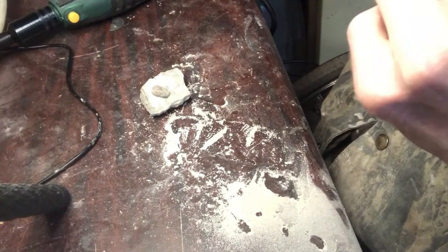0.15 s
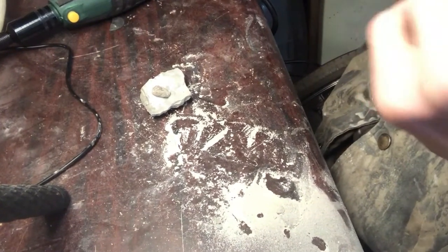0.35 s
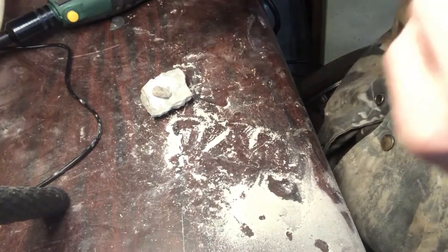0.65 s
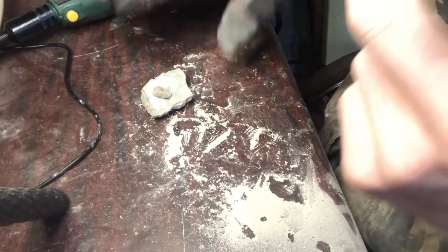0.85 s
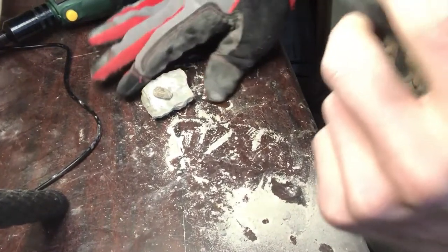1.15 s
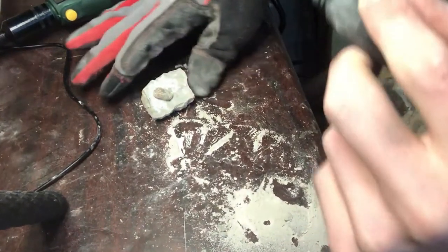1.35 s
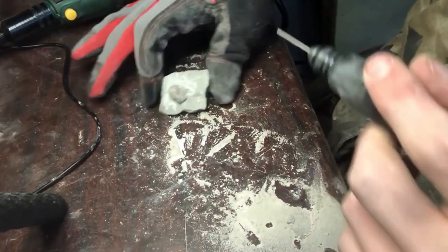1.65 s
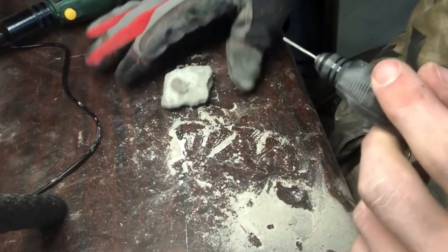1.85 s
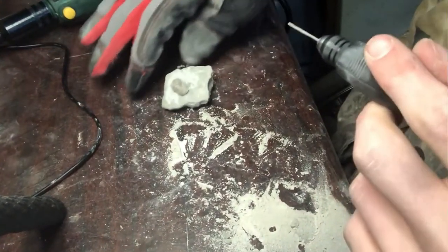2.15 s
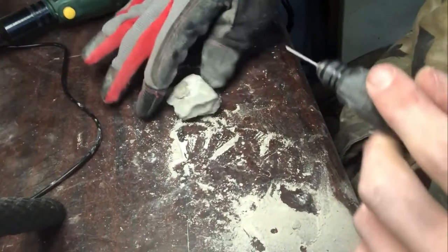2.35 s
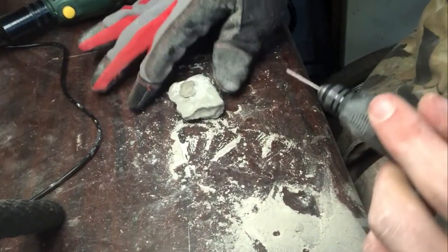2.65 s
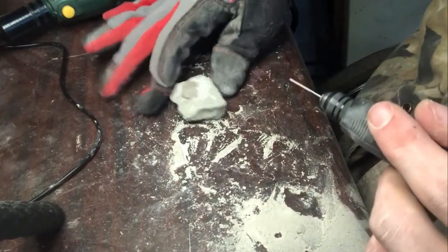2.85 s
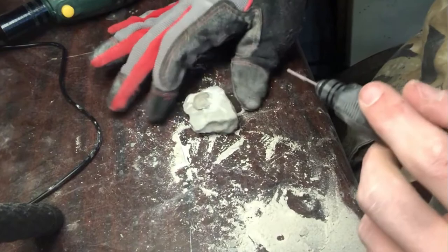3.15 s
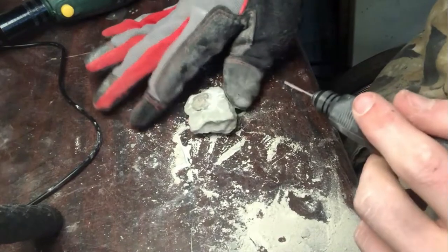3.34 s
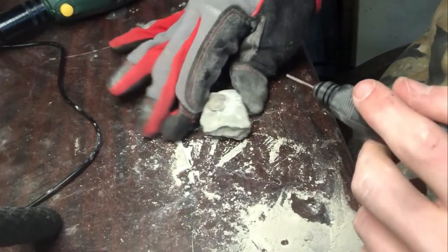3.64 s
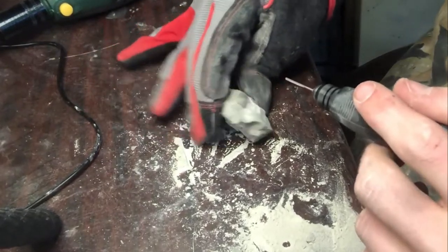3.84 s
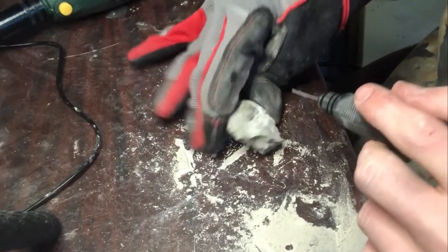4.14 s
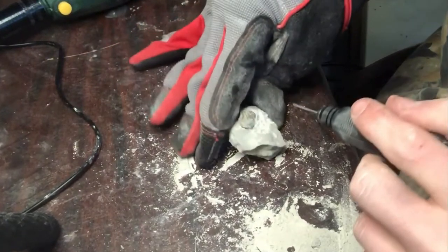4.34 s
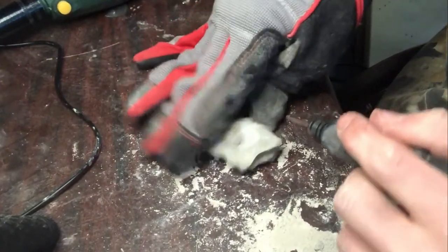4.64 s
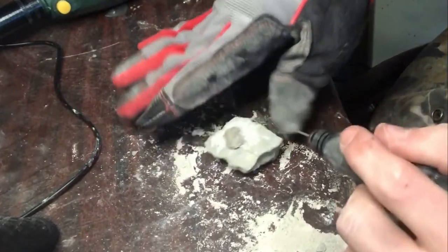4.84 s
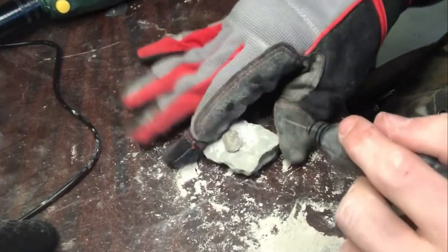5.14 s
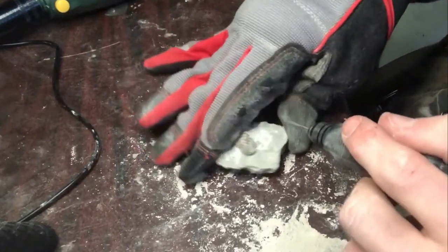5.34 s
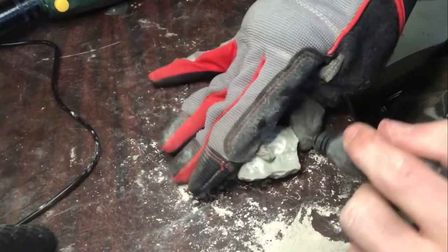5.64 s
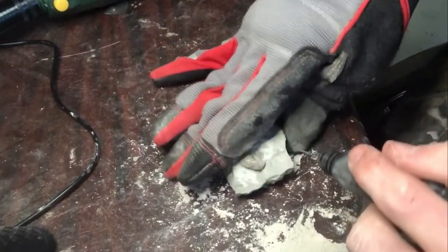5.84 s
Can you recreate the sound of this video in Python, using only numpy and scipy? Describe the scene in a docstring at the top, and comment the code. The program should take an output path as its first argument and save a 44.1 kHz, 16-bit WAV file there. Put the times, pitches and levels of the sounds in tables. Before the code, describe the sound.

A handheld rotary tool is already running at the start, close to the microphone, spinning freely. Its electric motor gives a high, buzzing whine over a lower hum, with a rush of fan air and a fine hiss. The pitch creeps slightly upward across the six seconds, and the whine swells and dips as the tool moves in the hand. From about 0.1 to 0.4 seconds a bearing gives one thin, very high, unsteady squeak. At 1.8 seconds a small rock tips onto the workbench with a sharp stony click, the strongest knock. Faint clicks and soft thuds follow until 2.4 seconds as the rock is turned, and another small cluster comes from 2.9 to 3.2 seconds. A single lighter click sounds at about 4.8 seconds. From 5.1 seconds the running motor fades steadily, reaching near silence just before 6 seconds.

```python
"""Rotary tool over a workbench

Close microphone, mono. A handheld rotary tool runs free and slowly gains speed. Its mains motor sings
on multiples of the shaft speed, chopped by the current pulses, over fan rush and brush hiss. A bearing
squeaks once at the start, and a gloved hand turns a small rock that clicks and thuds on the bench.
The last second fades out."""
import sys
import numpy as np
from scipy import signal
from scipy.fft import irfft
from scipy.io import wavfile
from scipy.ndimage import uniform_filter1d

SR = 44100
rng = np.random.default_rng(int(sys.argv[2]) if len(sys.argv) > 2 else 0)


def to_wav(s):
    """Save 16-bit WAV."""
    ch = np.atleast_2d(s).T  # columns
    pcm = np.round(np.clip(ch, -1, 1) * 32767)  # PCM
    wavfile.write(sys.argv[1], SR, pcm.astype(np.int16))


N = 264147
STEP = 128  # samples between control points
PULSE_HZ, PULSE_LAG = 119.965, 0.434  # two current pulses per mains cycle; lag in pulse cycles

# shaft speed: t/s, f/Hz
SHAFT_SPEED = [(0.0, 223.77), (0.12, 224.42), (0.36, 221.8), (1.03, 226.72), (1.14, 226.56), (1.58, 231.12),
               (1.97, 233.35), (2.08, 231.51), (2.52, 231.94), (2.78, 234.34), (3.03, 235.3),
               (3.16, 234.09), (3.49, 235.54), (3.64, 235.5), (3.89, 237.22), (4.48, 237.74),
               (4.61, 237.18), (4.87, 238.16), (5.02, 235.73), (5.17, 235.04), (5.38, 235.85),
               (5.8, 241.78), (5.99, 243.49)]
# once-per-turn shake, damped and delayed by the grip: t/s, level/dB, lag/turns
GRIP_SHAKE = [(0, -55, 0.15), (.45, -52, 0.19), (1.1, -56, 0.35), (1.4, -56, 0.31), (1.8, -54.5, 0.45),
              (2.1, -53, .24), (2.37, -53.5, 0.2), (2.43, -60, -0.16), (2.6, -60, -0.2), (2.9, -60, -0.18),
              (3.07, -66, 0.26), (3.25, -55.5, 0.43), (3.9, -52, 0.46), (4.5, -50, 0.39),
              (4.95, -63.5, 0.52), (5.5, -52.5, 0.4), (6, -57, .46)]


def motor(turns):
    """Tones at shaft multiples plus pulse multiples; a common pulse lag bunches them into bursts."""
    # tones, one list per family: shaft multiple, pulse multiple, relative level/dB, speed slope/(dB/Hz)
    tone_families = [
        [(16, 0, -1, 0), (15, 0, -19.5, 0.4), (17, 0, -27, 0.3), (18, 0, -20.5, -0.25), (14, 0, -21.5, .5)],
        [(16, -1, -0.5, 0.26), (16, -2, -3.5, -0.75), (16, -3, -7.5, -1.5), (16, 1, -9.5, -1.4),
         (16, 2, -7, -1)],
        [(8, 3, -3, -0.03), (8, 2, -7, -0.26), (8, 1, -6, 0.5), (8, 0, -12, .5), (8, 4, -9, -0.84),
         (8, 5, -14.5, -0.34), (8, -1, -19, 0.1), (8, -2, -18, -0.5), (9, 0, -17, 0.8), (10, 0, -16, -0.5),
         (6, 0, -15.5, 0.07), (24, 0, -18, 0.86), (2, 1, -21, 1.57), (3, -1, -28.5, 2.8), (3, 1, -28, -0.5),
         (4, 1, -22.5, 1.1), (5, -1, -28.5, -0.06), (4, -1, -17, -0.05), (4, 0, -20.5, -0.6),
         (5, 0, -21.5, -0.5), (7, 0, -24.5, 0), (22, 0, -25.5, 1.2), (25, 0, -21.5, -0.26), (29, 0, -18, 0)],
        [(32, 0, 0.5, 0), (31, 0, -12.5, 0.85), (33, 0, -10, 1.05), (32, -1, -19.5, 1.5), (32, 1, -21, 0),
         (34, 0, -13, -1), (36, 0, -27, -0.6), (40, 0, -15.5, 0.3), (42, 0, -19, .5), (43, 0, -20, 1.6),
         (53, 0, -15, -0.8), (63, 0, -22, 0.5), (57, 0, -18, 1.0), (50, 0, -21.5, 0)],
        [(48, 0, -2, -0.02), (47, 0, -15, -2), (49, 0, -7, -0.5), (46, 0, -14, 0)],
        [(1, 0, -3, 0.28), (3, 0, -8.5, -0.13), (1, -1, -29.5, 1.8), (1, 1, -21.5, 0), (2, -1, -20.5, 0.6)],
        [(2, 0, 0, 0), (3, -2, -16, -0.9), (1, 2, -17.5, 1)],
    ]
    # magnetic hum of the field coils: pulse multiple, level/dB, speed slope/(dB/Hz)
    coil_hum = [(.5, -88.5, -0.5), (1, -69, 0.1), (2, -59.5, .2), (3, -65, 0), (4, -68.5, 0.15),
                (5, -85, -2.5)]
    # wobble repeating every second turn:
    # shaft multiple, level/dB, speed slope/(dB/Hz), lag/cycles, lag slope/(cycles/Hz)
    wobble = [(.5, -75, 1.04, -0.19, -0.046), (1.5, -70, 0.2, 0.5, 0.09), (2.5, -68, 1.0, .5, 0.068),
              (3.5, -77.5, -0.24, -0.17, -0.0041)]
    speed_hz, = curves(SHAFT_SPEED, STEP)
    _, grip_lag = curves(GRIP_SHAKE, STEP)
    t = np.arange(len(speed_hz)) * STEP / SR
    offset_hz = np.minimum(speed_hz - 231.2, 5.5)  # from mid speed; case resonances level off at the top
    pulses = PULSE_HZ * t - PULSE_LAG
    whine_pulses = PULSE_HZ * t - .5 - 0.014 * offset_hz
    turns = turns[::STEP]
    turns = np.append(turns, turns[-1] + speed_hz[-1] * STEP / SR)
    turns = turns + 0.0042 * wander(rate_hz=10, count=1)[0]  # speed jitter blurs the high multiples
    path_phase = rng.random(64) * (np.arange(64) > 3)  # each high multiple leaves with its own delay
    levels_db, phases = [], []
    for (multiple, db, slope), drift in zip(coil_hum, wander(rate_hz=5, count=len(coil_hum))):
        levels_db.append(db + slope * offset_hz + 1.2 * drift)
        phases.append(multiple * pulses)
    slip = np.interp(t, (4.84, 4.96), [0, .5])  # the wobble skips one turn and comes back reversed
    for (order, db, slope, lag, lag_slope), drift in zip(wobble, wander(rate_hz=3, count=len(wobble))):
        levels_db.append(db + slope * offset_hz + 2.5 * drift)
        phases.append(order * turns - lag - lag_slope * offset_hz - slip)
    for family_db, family in zip(family_levels(offset_hz), tone_families):
        drifts = wander(rate_hz=6, count=len(family))
        sways = 0.068 * wander(rate_hz=1.5, count=len(family))  # the moving hand shifts each path
        for (order, multiple, db, slope), drift, sway in zip(family, drifts, sways):
            waver_db = min(.4 - .13 * db, 3) * drift  # weak tones waver most
            levels_db.append(family_db + db + slope * offset_hz + waver_db)
            shaft = turns - grip_lag if order == 1 else order * turns + sway
            chop = multiple * (whine_pulses if order == 16 else pulses)
            phases.append(shaft + chop + path_phase[order])
    return sum_tones(np.sqrt(2) * gain_of(levels_db), 2 * np.pi * np.array(phases))[:N]


def family_levels(offset_hz):
    """Motor tone families in dB; three of them grow with speed and share the whine's swells."""
    # at the microphone as the hand turns the tool:
    # t/s, commutator whine/dB, its second harmonic/dB, twice-per-turn hum/dB
    tone_levels = [(0, -49, -56, -57.5), (.22, -50, -56.5, -61.5), (.4, -55.5, -58, -65),
                   (.52, -49.5, -56.5, -68), (.68, -52, -57, -59), (.82, -47, -60.5, -59),
                   (1.0, -47, -57, -52.5), (1.2, -47, -59.5, -52.5), (1.4, -47.5, -69, -49),
                   (1.6, -45.5, -60.5, -49), (2.0, -44.5, -60.5, -54.5), (2.2, -45.5, -61, -62.5),
                   (2.55, -43.5, -61, -48.5), (2.8, -49, -63, -53), (3.2, -48.5, -59, -53),
                   (3.55, -51, -57.5, -53.5), (4.0, -45, -56, -50), (4.4, -46.5, -56, -52),
                   (4.65, -45, -55, -50.5), (5.0, -47, -56, -52), (5.22, -53.5, -55, -54.5),
                   (5.52, -44.5, -55, -51.5), (5.85, -54.5, -55.5, -43)]
    whine, second_harmonic, hum = curves(tone_levels, STEP)
    shake, _ = curves(GRIP_SHAKE, STEP)
    swell_db = whine + 47  # above the whine's usual level
    side_tone = -59 + 0.29 * offset_hz + 0.29 * swell_db
    slot_buzz = -51 + 0.17 * offset_hz + 0.25 * swell_db
    third_harmonic = -61 + .9 * offset_hz + 0.22 * swell_db
    return whine, side_tone, slot_buzz, second_harmonic, third_harmonic, shake, hum


def motor_noise(turns):
    """Case rumble throbs a little with each current pulse, fan rush and brush hiss with each turn."""
    # case rumble: f/Hz, density/dB
    rumble_spectrum = [(36, -124), (55, -96), (85, -105), (200, -90), (300, -91), (420, -86.5), (850, -88),
                       (1250, -91.5), (1600, -89), (2250, -88.5), (2800, -93.5), (3600, -102)]
    # fan rush: f/Hz, relative density/dB
    rush_spectrum = [(2400, -41.5), (3000, -33.5), (3700, -28.5), (4500, -31.5), (5200, -32), (5800, -36),
                     (7000, -33), (7700, -35.5), (8600, -42.5)]
    # brush hiss: f/Hz, relative density/dB
    hiss_spectrum = [(7000, -41), (8400, -35.5), (10000, -35), (12000, -35), (14000, -35.5), (16000, -37.5)]
    # gains on those two spectra: t/s, fan rush/dB, brush hiss/dB
    noise_gains = [(0, -56, -60.5), (.75, -55.5, -59.5), (1.15, -57.5, -62.5), (2.5, -57.5, -60.5),
                   (3.5, -58, -60.5), (4.4, -58, -59), (5.9, -59.5, -59.5)]
    rush_db, hiss_db = curves(noise_gains)
    pulse_throb = np.cos(2 * np.pi * (PULSE_HZ * np.arange(N) / SR - PULSE_LAG))
    turn_throb = np.cos(2 * np.pi * turns) + .7 * np.cos(4 * np.pi * turns)
    rumble = noise(rumble_spectrum, patchy_db=2.0) * gain_of(0.86 * pulse_throb)
    rush = noise(rush_spectrum, patchy_db=1.24) * gain_of(rush_db + turn_throb)
    hiss = noise(hiss_spectrum, patchy_db=1.8) * gain_of(hiss_db + .7 * turn_throb)
    return rumble + rush + hiss


def rock_knocks():
    """Each tip of the rock clicks the stone and thuds the bench under it."""
    # the rock tips onto the bench: t/s, click peak/dB, thud relative to click/dB
    knocks = [(1.820, -26.5, -14.5), (1.851, -51.5, 9), (1.901, -54.5, 8.5), (2.046, -65, 12.5),
              (2.075, -53, 12), (2.116, -56, 3), (2.249, -58, 10), (2.296, -59, 10), (2.385, -54, 12.5),
              (2.94, -63, 11), (2.99, -54.5, 11), (3.034, -61, 10), (3.085, -59, 7), (3.19, -57.5, 10.5),
              (4.7615, -38, -18)]
    # modes of the stone: f/Hz, level before the contrast factor/dB, t60/s
    stone_modes = [(1093, -7.5, 0.054), (1330, -4.5, .04), (1750, -1, 0.027), (2140, -3.5, 0.041),
                   (2540, -5, 0.025), (3220, -5.5, 0.02), (5350, -15, .015)]
    # modes of the bench: f/Hz, relative level/dB, t60/s
    bench_modes = [(214.4, -4.5, .15), (332, -1.5, .12), (414, 2, 0.14), (680, -0.5, 0.081),
                   (865, -2, 0.066)]
    out = np.zeros(N + SR)
    for start_s, db, thud_db in knocks:
        contrast = 1.5 + .15 * max(-27 - db, 0)  # softer blows wake mostly the strongest mode
        modes = [(hz, mode_db * contrast, t60) for hz, mode_db, t60 in stone_modes]
        click = ring(modes, uneven_db=1.5, rise_s=.0006)
        thud = gain_of(thud_db) * ring(bench_modes, uneven_db=3, rise_s=0.0022)
        out[round(start_s * SR):][:len(click)] += gain_of(db) * (click + thud)
    return out[:N]


def bearing_squeak(turns):
    """A thin unsteady whistle, struck once per turn so that side tones stand a shaft speed apart."""
    # main tone of the squeak: t/s, level/dB, f/Hz
    whistle = [(.12, -72.5, 13000), (.135, -51, 12960), (.16, -56, 12900), (.205, -51, 13040),
               (.225, -44, 12990), (.25, -56, 13030), (.275, -54, 12880), (.3, -49, 12890),
               (.325, -59, 12880), (.35, -58, 13150), (.37, -85, 13150)]
    db, hz = curves(whistle)
    pitch_drift, flutter = map(per_sample, wander(rate_hz=60, count=2))
    angle = 2 * np.pi * np.cumsum(hz + 22 * pitch_drift) / SR
    tones = sum(gain * np.cos(angle + side * 2 * np.pi * turns)
                for side, gain in ((0, 1), (1, 0.71), (-1, 0.3), (2, .25)))
    return gain_of(db + 1.8 * flutter) * tones


def ring(modes, uneven_db, rise_s):
    """Decaying modes with a soft start, peak 1; each blow lands elsewhere and favours other modes."""
    t = np.arange(SR // 8) / SR
    blow = 0
    for hz, db, t60 in modes:
        decay = gain_of(db + uneven_db * rng.standard_normal() - 60 * t / t60)
        blow = blow + decay * np.sin(2 * np.pi * hz * t + rng.uniform(0, 2.1))
    blow *= 1 - np.exp(-t / rise_s)
    return blow / abs(blow).max()


def sum_tones(amplitudes, angles):
    """Sum of tones whose amplitude and angle run straight between control points."""
    ramp = np.arange(STEP, dtype=np.float32) / STEP
    out = 0
    for amplitude, angle in zip(amplitudes.astype(np.float32), angles):
        start = (angle[:-1, None] % (2 * np.pi)).astype(np.float32)
        advance = np.diff(angle)[:, None].astype(np.float32)
        envelope = amplitude[:-1, None] + np.diff(amplitude)[:, None] * ramp
        out = out + envelope * np.cos(start + advance * ramp)
    return out.ravel()


def noise(spectrum, patchy_db):
    """Noise of the given spectral density, with faint drifting patches."""
    bin_hz = np.fft.rfftfreq(1024, 1 / SR)
    hz, db = np.transpose(spectrum)
    real, imag, patches = rng.standard_normal((N // 512 + 3, 513, 3), dtype=np.float32).T
    patches = uniform_filter1d(uniform_filter1d(patches, size=10, axis=0), size=8, axis=1)
    density_db = np.interp(np.log(bin_hz + 1), np.log(hz), db, left=-150, right=-150)
    spectra = (real + 1j * imag) * gain_of(density_db[:, None] + patchy_db * patches / patches.std())
    window = np.sin(np.pi * (np.arange(1024) + .5) / 1024)  # squares of overlapping halves sum to 1
    frames = irfft(spectra, axis=0).T * window * np.sqrt(1024 * SR / 4)
    return (frames[1:, :512] + frames[:-1, 512:]).ravel()[:N]


def wander(rate_hz, count):
    """Random drifts of unit size at the control points, one row each."""
    white = rng.standard_normal((count, N // STEP + 2))
    drifts = uniform_filter1d(white, max(int(SR / STEP / rate_hz), 1), axis=1)
    return drifts / drifts.std(axis=1, keepdims=True)


def curves(rows, step=1):
    """Every value column of a time table at each step-th sample."""
    times, *columns = np.transpose(rows)
    return [np.interp(np.arange(0, N + step, step)[:N] / SR, times, column) for column in columns]


def per_sample(points):
    """Control points joined up at every sample."""
    return np.interp(np.arange(N), np.arange(len(points)) * STEP, points)


def gain_of(db):
    """Decibels to amplitude."""
    return 10 ** (np.asarray(db) / 20)


def scene():
    """The tool in the hand, close to the microphone, and the rock on the bench."""
    turns = np.cumsum(curves(SHAFT_SPEED)[0]) / SR
    return (motor(turns) + motor_noise(turns) + rock_knocks() + bearing_squeak(turns))[None]


def record(dry):
    """A straight fade to silence, faint low room tone after it, then a steep treble cut."""
    fade_s, room_start_s, cutoff_hz = (5.09, 5.935), 5.957, 15725
    t = np.arange(N) / SR
    faded = dry * np.interp(t, fade_s, [1, 0])
    rumble = signal.lfilter([.03], [1, -.97], rng.standard_normal(N))
    room_tone = gain_of(-80.5) * rumble / rumble.std() * np.clip((t - room_start_s) / 0.012, 0, 1)
    lowpass = signal.firwin(2047, cutoff_hz, window=("kaiser", 9), fs=SR)
    return signal.oaconvolve(faded + room_tone, lowpass[None], "same")


dry = scene()
out = record(dry)
to_wav(out)
```